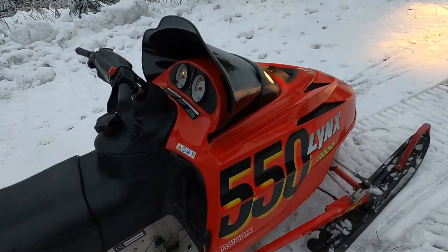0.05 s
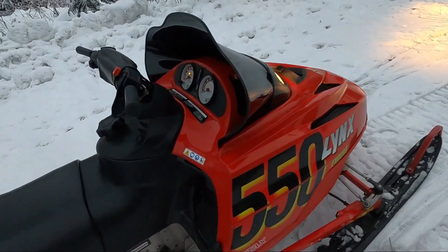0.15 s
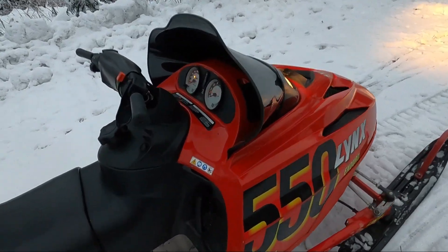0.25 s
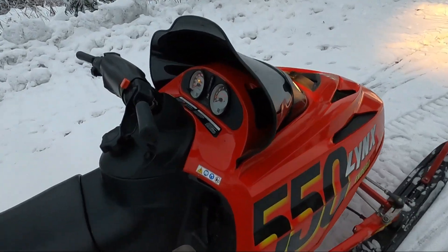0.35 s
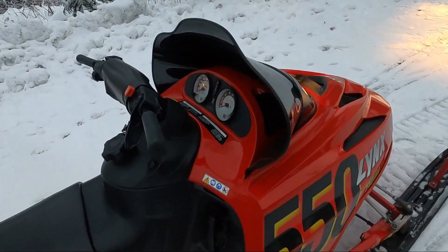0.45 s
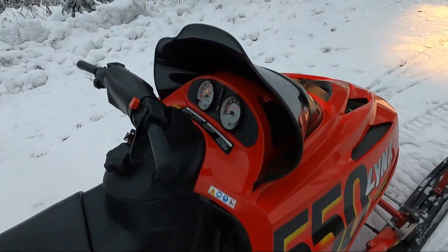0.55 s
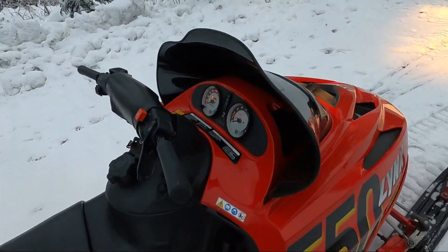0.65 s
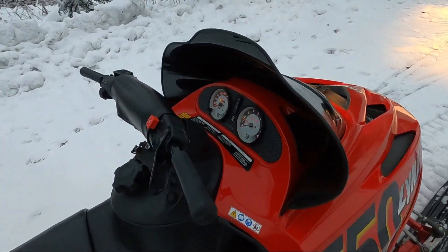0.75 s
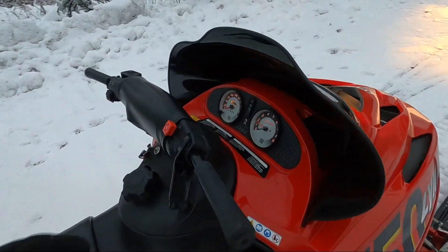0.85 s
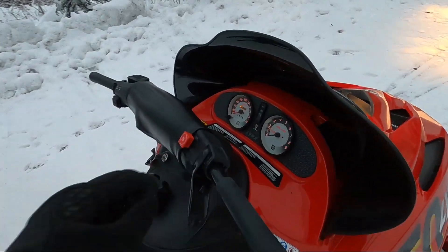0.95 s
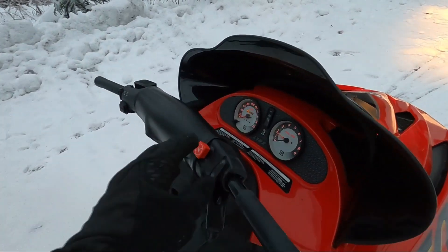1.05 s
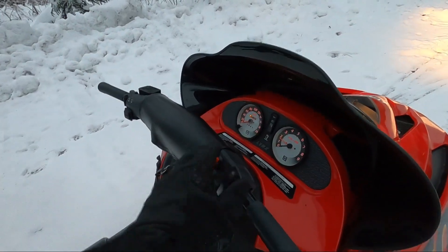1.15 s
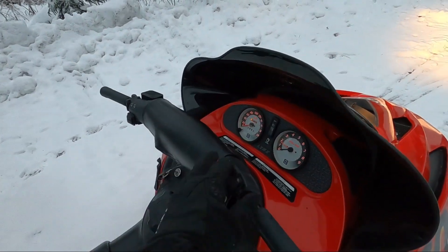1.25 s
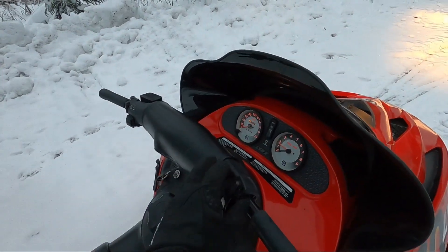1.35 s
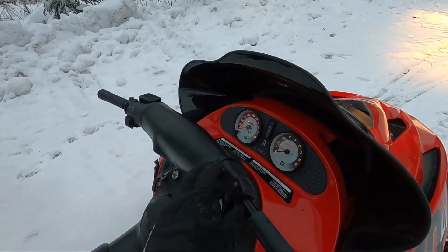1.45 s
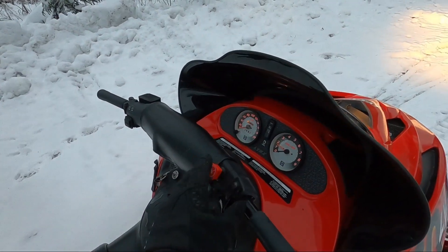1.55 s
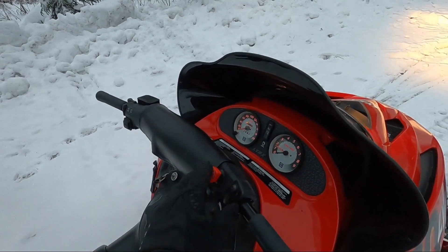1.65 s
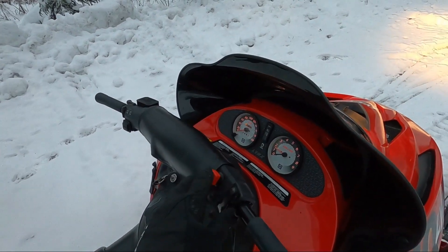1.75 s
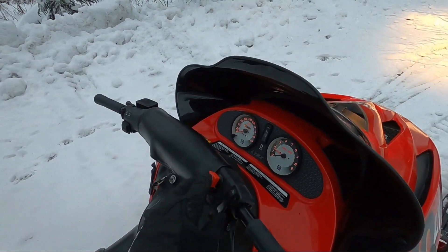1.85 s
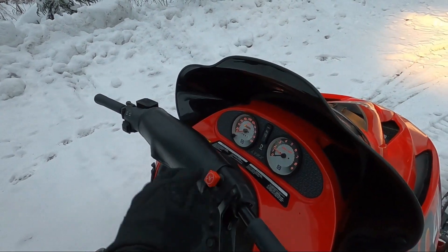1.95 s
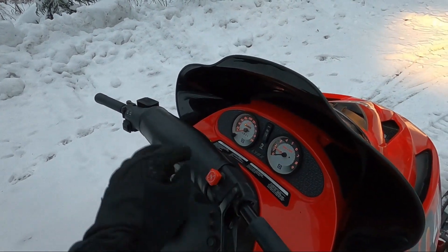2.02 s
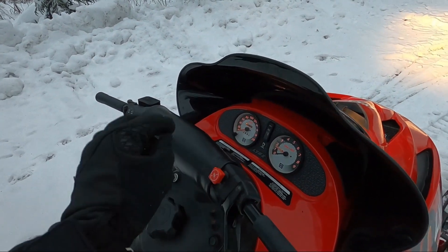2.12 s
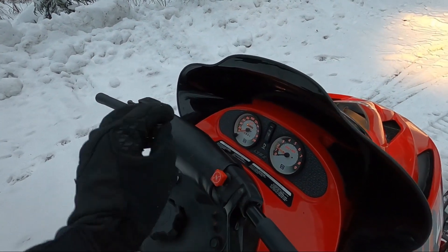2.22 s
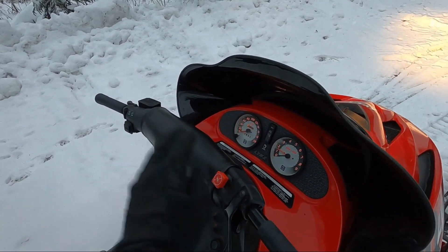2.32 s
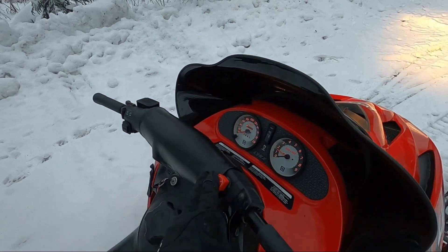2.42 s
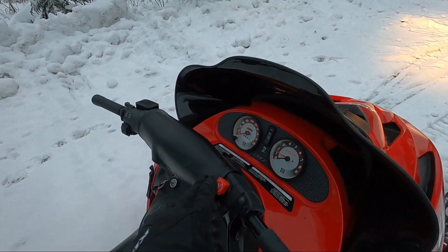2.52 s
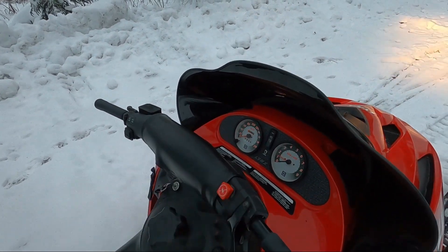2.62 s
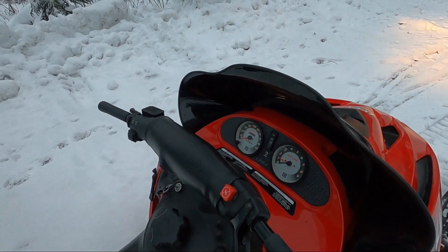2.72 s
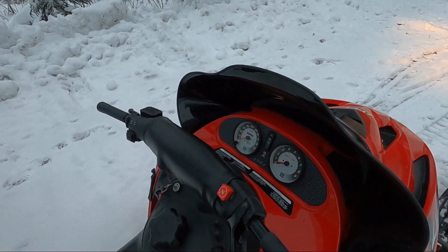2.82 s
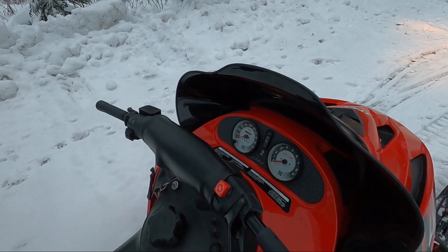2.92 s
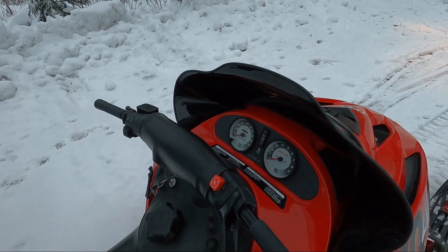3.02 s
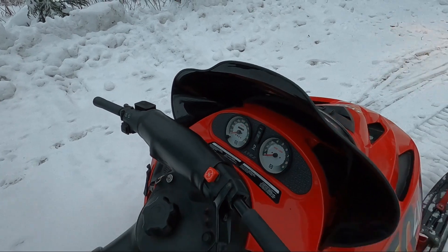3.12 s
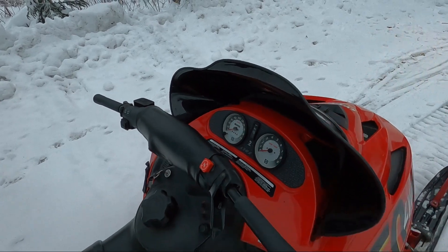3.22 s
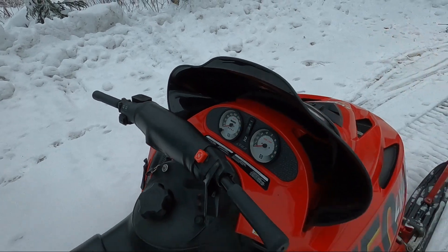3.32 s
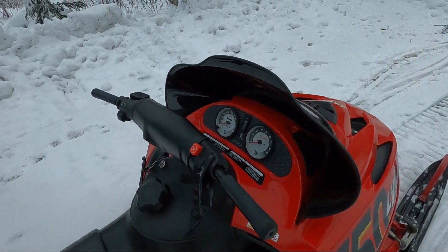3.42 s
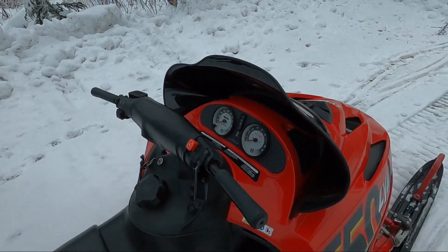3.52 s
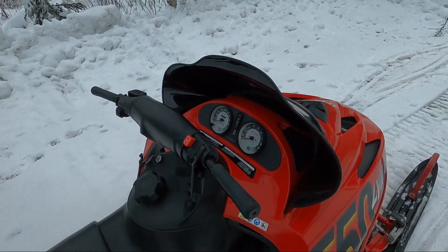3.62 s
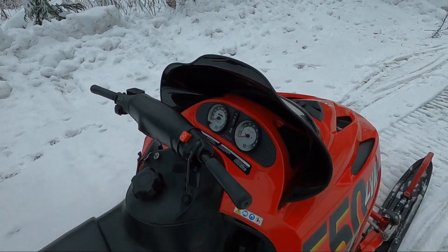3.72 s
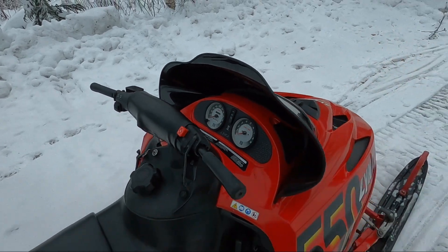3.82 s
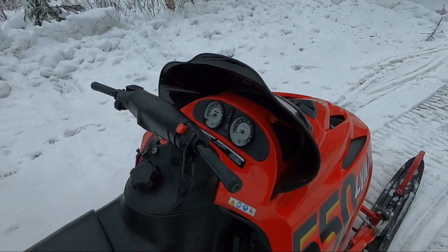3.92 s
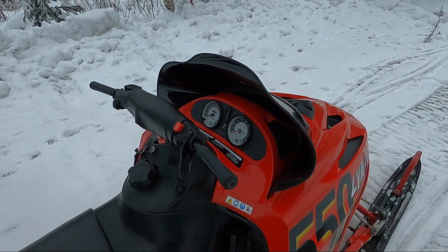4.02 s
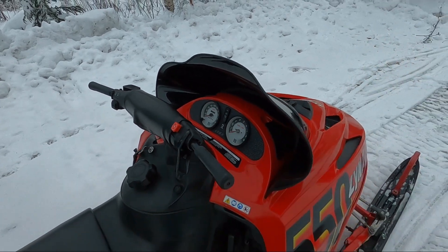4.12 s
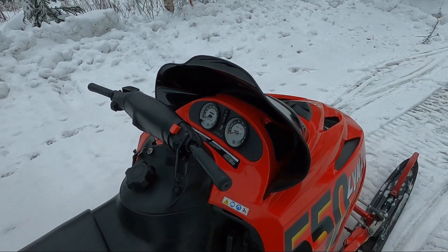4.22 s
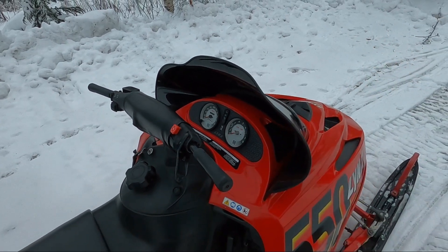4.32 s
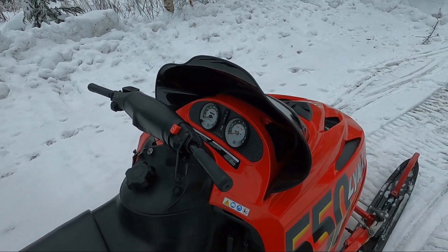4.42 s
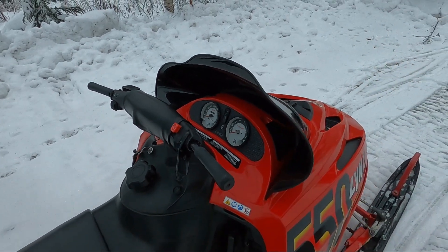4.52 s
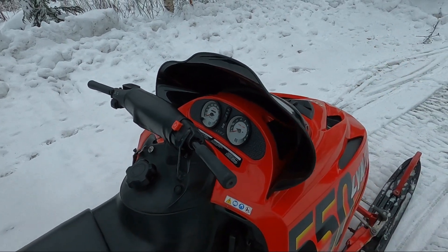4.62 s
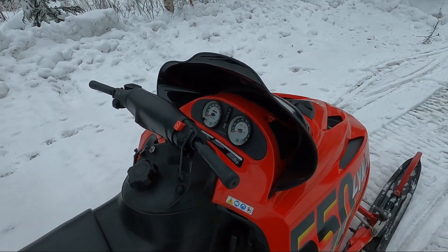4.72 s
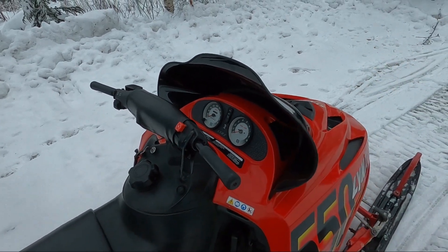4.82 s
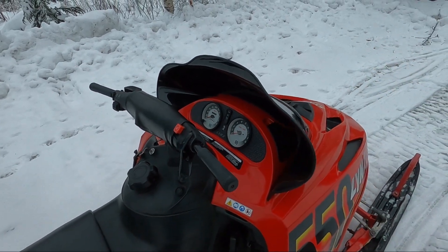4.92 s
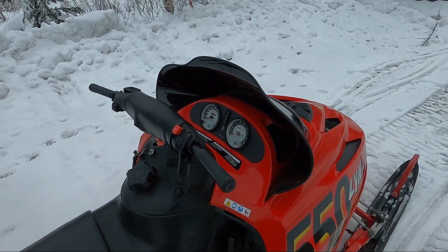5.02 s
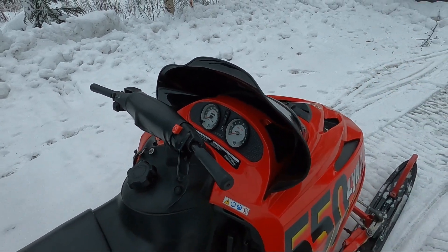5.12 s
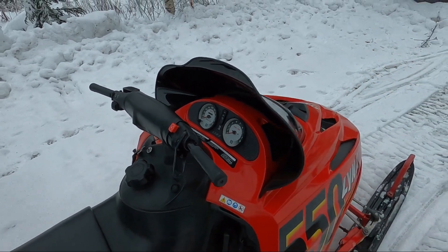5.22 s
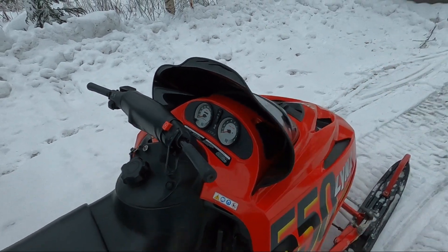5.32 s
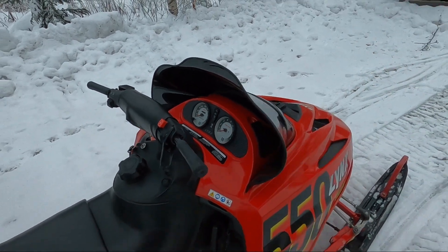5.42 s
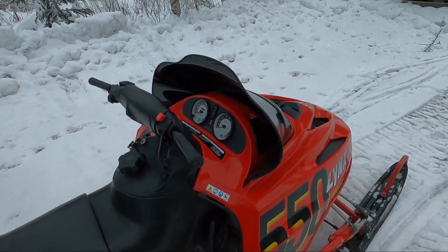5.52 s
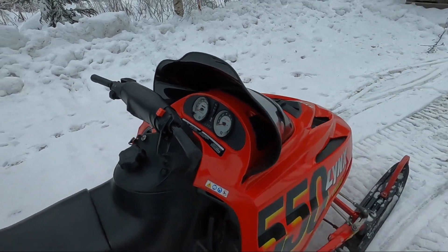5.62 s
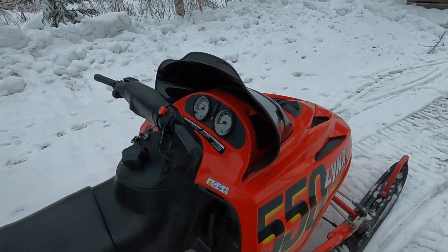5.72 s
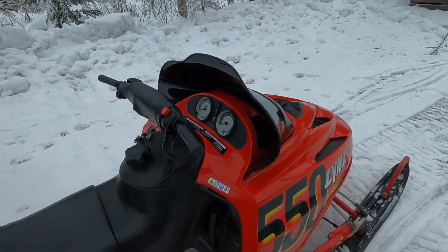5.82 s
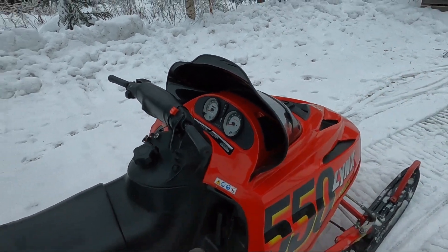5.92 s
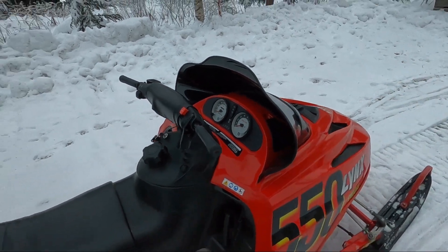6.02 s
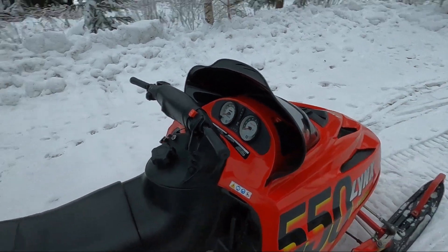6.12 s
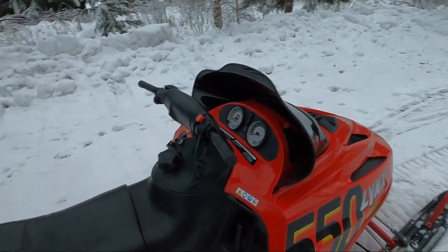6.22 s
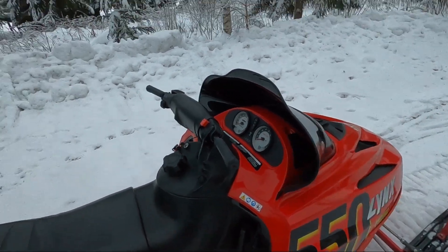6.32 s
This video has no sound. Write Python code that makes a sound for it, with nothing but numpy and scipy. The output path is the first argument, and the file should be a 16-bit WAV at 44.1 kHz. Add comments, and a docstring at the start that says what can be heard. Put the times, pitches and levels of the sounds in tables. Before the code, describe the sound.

Close to a parked snowmobile on open snow, its twin two-stroke engine idles loudly: fast low pulses, irregular popping barks, piston clack and shaken-panel rattle. A plastic switch snaps; the strokes slow over about a second amid dull knocks and clanks. Quiet air remains, with small clicks, bumps and cloth rubbing the handheld camera.

```python
"""Two-stroke snowmobile switched off

A twin-cylinder engine idles in still air: each piston stroke pulses pipe and crankcase resonances;
ignitions add barks and shaken-panel rattle. A switch snaps and the stroke rate falls evenly to rest
amid noisy knocks. Then gloves and sleeves rub on the camera: coloured noise swells, taps and body hum."""
import sys
import numpy as np
from scipy import signal
from scipy.fft import rfft, irfft
from scipy.io import wavfile
from scipy.ndimage import uniform_filter1d, minimum_filter1d

SR = 44100
rng = np.random.default_rng(int(sys.argv[2]) if len(sys.argv) > 2 else 0)


def wav_out(sig):
    """Save sig, one row per channel (or a flat mono array), as 16-bit PCM at SR to the path in sys.argv[1]."""
    wavfile.write(sys.argv[1], SR, np.round(np.clip(np.atleast_2d(sig).T, -1, 1) * 32767).astype(np.int16))


N = 280464
T = np.arange(N) / SR

# All table levels are relative unless said otherwise; "pan" is left minus right.
# Air hush colour. Each row: frequency in Hz, density in dB per Hz.
AIR_COLOUR = [(15, -53), (25, -24), (202, -21.5), (244, -9), (309, -17), (916, -29), (6000, -29),
              (14000, -55)]
# Far drone. Each row: frequency in Hz, width in Hz, level in dB.
DRONE_MODES = [(235, 51, 0)]

# Cloth strokes over the camera. Each row: middle in seconds, length in seconds, swish in dB,
# body hum in dB, pressure from 0 to 1, swish pan in dB.
RUBS = [(3.899, 0.22, -56.5, -54, 0.45, 2.5), (4.413, 0.11, -64, -77, 0, 4),
        (4.683, 0.44, -56.5, -65, 0.47, 12), (5.005, 0.055, -50, -69, 0.1, 13.5),
        (5.122, 0.12, -51.5, -64, 0.06, 4.5), (5.411, 0.12, -54, -44, 0.86, -1),
        (5.514, 0.09, -43, -40.5, 1, -3.5), (5.6, 0.044, -48, -60, 0.9, -3),
        (5.687, 0.11, -45, -37.5, 0.74, 0.5), (5.78, 0.093, -43.5, -71, 0.69, -0.5),
        (5.983, 0.11, -42.5, -38, 0.85, -1.5), (6.335, 0.33, -61, -58, 0.96, 8)]
# Cloth colours: pressed, light, dragged, sleeve rush, low flutter.
# Each row: frequency in Hz, density in dB per Hz.
PRESSED_COLOUR = [(210, -10), (350, -5.5), (480, -7), (630, 3.5), (800, -11.5), (1000, -6), (1260, 1.5),
                  (1550, -6.5), (3300, -8.5), (8030, -21.5), (14000, -42.5)]
LIGHT_COLOUR = [(400, -23), (1400, 3), (3000, 3), (5500, -3), (8200, -5), (10000, -16.5), (14000, -24)]
SCRAPE_COLOUR = [(88, -18), (180, 2), (240, -16), (370, -2), (520, -11.5), (760, -19.5), (1200, -12),
                 (1600, -28)]
RUSH_COLOUR = [(1600, -10), (2600, -2), (3600, -4.5), (4650, 1), (5500, -8), (6400, -11), (7400, -6.5),
               (8900, -10.5), (10400, -24), (12100, -18), (15000, -38)]
FLUTTER_COLOUR = [(25, 5), (50, 2), (120, -29), (300, -17)]
# Camera body under a rub, then under the drag. Each row: frequency in Hz, width in Hz, level in dB.
BODY_MODES = [(158, 17.3, 0)]
DRAG_MODES = [(60.4, 42, -5), (162, 38, 1)]
# Grip tightening rings the camera body. Each row: start in seconds, level in dB.
GRIPS = [(5.254, -45.5), (5.369, -31)]
# Camera shell clicks, then soft hand bumps.
# Each row: start in seconds, peak before panning in dB, pitch in Hz, pan in dB.
CLICKS = [(4.575, -45, 1120, 17), (4.641, -42, 855, 14), (4.655, -37, 1080, 10), (4.6955, -32, 1480, 11),
          (4.744, -37.5, 1200, 13), (4.760, -38.5, 744, 13), (4.791, -43, 1970, 23)]
BUMPS = [(3.722, -42.5, 200, -1), (3.871, -36, 190, 0), (3.937, -44, 200, 2), (3.99, -39, 204, 1),
         (5.615, -36.5, 50, -18)]

# Stop switch colour. Each row: frequency in Hz, density in dB per Hz.
SWITCH_COLOUR = [(1500, 2.5), (3000, 2.5), (6000, -7.5), (10000, -7.5), (15000, -34)]

# Knocks of loose crank and drive parts.
# Each row: start in seconds, jolt in dB, thud in dB, ring in dB, crack in dB.
KNOCKS = [(2.867, -20, -29, -34.5, -55), (2.904, -24, -36.5, -42, -63), (2.947, -22, -28, -34.5, -49.5),
          (2.993, -21, -33.5, -30.5, -51), (3.041, -25, -31.5, -44, -52), (3.066, -27, -36.5, -47, -63),
          (3.102, -28, -33.5, -32.5, -52), (3.132, -22, -37, -40, -56), (3.186, -44, -41, -40.5, -53),
          (3.228, -26, -35, -36.5, -53), (3.286, -22, -55, -44, -50.5), (3.342, -27.5, -37.5, -35, -61),
          (3.416, -36, -44.5, -45, -65), (3.47, -31, -34.5, -35, -43.5), (3.569, -35.5, -46, -47.5, -72),
          (3.609, -46, -53.5, -52, -55.5), (3.662, -48, -60, -51.5, -80), (3.714, -49, -66, -60, -80)]
# Thud, ring and chassis modes of a knock. Each row: frequency in Hz, width in Hz, level in dB.
THUD_MODES = [(494, 320, -6), (752, 180, -0.5), (1136, 130, -9.5)]
RING_MODES = [(1350, 220, -3), (1770, 200, 4.5), (2560, 760, -10.5)]
CHASSIS_MODES = [(74.7, 6, 4), (29.7, 9.2, -3.5)]
# Crack and tail colours of a knock. Each row: frequency in Hz, density in dB per Hz.
CRACK_COLOUR = [(2000, -4), (3900, -0.5), (5000, -5), (6200, -5), (8000, -11.5), (10000, -31)]
TAIL_COLOUR = [(700, -7), (1100, 1), (1400, -1), (1850, -3.5), (2300, -8), (4000, -20)]

# Engine on its mounts. Each row: frequency in Hz, width in Hz, level in dB.
MOUNT_MODES = [(30, 6.3, -2), (53.7, 4.8, -0.5)]
# Crankcase. Each row: frequency in Hz, width in Hz, first piston in dB, second piston in dB.
CRANKCASE_MODES = [(810, 135, 0, 0), (1130, 110, -11, -11), (1850, 220, -10, -11), (2400, 150, -7, -15),
                   (2980, 120, -16, -10), (3350, 220, -14, -17)]
# Cooling fan, then panel rattle. Each row: frequency in Hz, density in dB per Hz.
FAN_COLOUR = [(100, -25), (170, -7.5), (369, -8), (626, -13.5), (830, -17), (1000, -17), (1100, -12),
              (1410, -17.5), (2390, -18), (8000, -42.5), (15500, -69)]
RATTLE_COLOUR = [(150, -23.5), (230, -10), (272, 5), (308, -19.5), (525, -7.5), (603, -32), (882, -6),
                 (995, -12.5), (1080, -14.5), (2090, -12), (2850, -20), (3500, -19), (7900, -32.5),
                 (15500, -60)]
# Ringing panels and clutch. Each row: frequency in Hz, width in Hz, level in dB.
PANEL_MODES = [(695.6, 26, -5.5), (885, 27, -2.5), (1113, 28, -8.5), (1342, 20, -7.5), (1615, 26, -4.5),
               (1824, 61, -11.5), (1902, 54, -6.5), (2030, 22, -1.5), (2155, 33, -5.5), (2257, 25, -9),
               (2500, 30, -12.5), (2650, 20, -11.5)]
# Ignitions, mostly three or six strokes apart. Each row: time in seconds, rattle in dB, bark in dB.
FIRINGS = [(0.073, -14.5, -25.5), (0.129, -36, -34), (0.210, -23.5, -28), (0.331, -22, -28),
           (0.408, -17, -24), (0.448, -24, -25), (0.604, -14.5, -26.5), (0.66, -17, -24), (0.712, -16, -26),
           (0.825, -18.5, -23), (0.940, -14.5, -22.5), (0.997, -14.5, -24), (1.051, -16.5, -24),
           (1.158, -15, -24), (1.214, -27, -20.5), (1.271, -15, -24.5), (1.365, -14.5, -24.5),
           (1.419, -20.5, -27), (1.535, -15.5, -24), (1.592, -17, -26), (1.648, -20.5, -22.5),
           (1.768, -16.5, -25), (1.867, -13.5, -22), (1.921, -22, -27), (2.034, -17, -22.5),
           (2.131, -12.5, -24), (2.264, -16, -23.5), (2.380, -23, -24), (2.460, -21, -28)]
# Air moved per stroke, held before the first row. Each row: time in seconds, level in dB.
PUFF_LEVEL = [(2.55, -1.5), (2.95, 1.5), (3.12, -4.5), (3.28, -3.5), (3.4, -16.5)]
# Exhaust and intake of a stroke, hot. Each row: frequency in Hz, level in dB.
PIPE_COLOUR = [(22, -21), (36, -20.5), (52, -3.5), (68, -3.5), (86, 15), (106, 6), (130, 1.5), (158, -17),
               (210, -16.5), (300, -23.5), (500, -44)]
# Pipe struck by an ignition, gas noise, lingering hum. Each row: frequency in Hz, width in Hz, level in dB.
BARK_MODES = [(82.7, 11, -2), (143, 25, -14), (186, 18, -13.5), (268.2, 12.2, -13), (455, 110, -36.5)]
GAS_MODES = [(270, 24, 9), (490, 140, -4), (704, 29, -6.5), (860, 27, -3.5), (1125, 280, -8)]
PIPE_HUM_MODES = [(76.36, 2.1, 0)]

# Rub: bell exponent; the hum comes later and lasts longer.
RUB_SHAPE, HUM_LAG_S, HUM_STRETCH = 1.52, 0.016, 1.16
GRIP_HZ, GRIP_RISE_S, GRIP_FALL_S, GRIP_PAN_DB = 150.8, 0.014, 0.061, -24.5
# A sleeve drags over the microphone; its bright rush starts earlier. Times are middles.
DRAG_S, DRAG_LENGTH_S, DRAG_DB = 6.2, 0.14, -37.5
RUSH_S, RUSH_LENGTH_S, RUSH_DB = 6.182, 0.16, -42.5
SWITCH_S, SWITCH_DB, SWITCH_FALL_S = 2.4635, -20, 0.0025
# Piston strokes per second at idle, and at the start of the coast.
IDLE_HZ, COAST_HZ, FRICTION_HZ_PER_S = 52, 47.4, 50
LAST_SPARK_S = FIRINGS[-1][0]
REST_S = LAST_SPARK_S + COAST_HZ / FRICTION_HZ_PER_S
# An ignition throws the crank ahead by a share of a stroke, then it sags back.
KICK_STROKES, KICK_RISE_S, KICK_SAG_S = 0.25, 0.023, 0.066
# Stroke rates: rocking sets in below, slaps sound above, drive train is slack below.
ROCK_BELOW_HZ, SLAP_ABOVE_HZ, STALL_HZ = 38, 28, 14
ROCK_DB = 2.5
LOADED_SLAP_DB, UNLOAD_S, SLAP_FADE_DB_PER_S = -5, 0.067, 0.5
# Random spread between ignitions: pitch as a share, level in dB.
PANEL_DETUNE, PANEL_SCATTER_DB = .006, 1.8
# Pipe cooling: frequency ratio, time constant, cold level.
COLD_RATIO, COOLING_S, COLD_DB = 0.871, 0.17, 18.5
LIMIT_DB, LIMIT_S, TOP_HZ = -4.5, .006, 15600


def undb(db):
    """Amplitude ratio of a level in dB."""
    return 10 ** (np.asarray(db) / 20)


def curve(rows, axis=1):
    """One table column joined by straight lines in time."""
    rows = np.array(rows)
    return np.interp(T, rows[:, 0], rows[:, axis])


def unit(x):
    """Scale to unit RMS."""
    return x / np.sqrt(np.mean(x ** 2))


def noise():
    """White Gaussian noise."""
    return rng.standard_normal(N)


def walk(rate_hz):
    """Random wander: straight lines between new values at the given rate."""
    return 0.85 * np.interp(T * rate_hz, np.arange(N), noise())


def ring(x, response):
    """Pass x through a response of unit energy."""
    return signal.fftconvolve(x, response / np.linalg.norm(response))[:len(x)]


def colour(x, points, size=8192):
    """Minimum-phase filter through (Hz, dB) points, falling away beyond both ends."""
    hz, db = np.transpose(points)
    f = np.arange(size // 2 + 1) * SR / size + 1
    above = np.maximum(f / hz[-1], 1) ** 4
    below = np.maximum(hz[0] / f, 1)
    db = np.interp(np.log(f), np.log(hz), db) - 20 * np.log10(above * below)
    cepstrum = irfft(np.log(undb(db)))[:size // 2]
    cepstrum[1:] *= 2  # folded: causal
    return ring(x, irfft(np.exp(rfft(cepstrum, size))))


def resonate(x, modes, order=0):
    """Damped resonances (Hz, width Hz, dB); order 1 gives a soft onset and steep flanks."""
    t = T[:min(len(x), SR)]
    response = 0
    for hz, width, db in modes:
        decay = (width * t) ** order * np.exp(-np.pi * width * t)
        response = response + undb(db) * width * decay * np.sin(2 * np.pi * hz * t)
    return ring(x, response)


def swell(start, rise, fall):
    """Envelope: linear rise to 1, exponential decay."""
    age = T - start
    return np.clip(age / rise, 0, 1) * np.exp(-np.clip((age - rise) / fall, 0, 50))


def bell(middle, length):
    """Envelope of one sliding movement."""
    return np.exp(-np.minimum(np.abs(2 * (T - middle) / length) ** RUB_SHAPE, 50))


def smear(pulses, rise, fall):
    """Give every pulse an envelope."""
    return signal.fftconvolve(pulses, swell(0, rise, fall)[:SR])[:N]


def cushion(x, hz):
    """Rubber mounts pass only the lows."""
    return signal.sosfilt(signal.butter(2, hz, fs=SR, output="sos"), x)


def pan(db):
    """Left and right gains differing by db."""
    return undb(np.array([[.5], [-.5]]) * db)


def spread(make, side_db, corner_hz):
    """Two draws of a sound as mid and side; the side is high-passed, so ports differ most in the treble."""
    highpass = signal.butter(1, min(corner_hz, SR / 3), "high", fs=SR, output="sos")
    side = signal.sosfilt(highpass, make())
    return make() + undb(side_db) * side * np.array([[1], [-1]])


def still_air():
    """Open-air hush of coloured noise with a far low drone of resonant noise."""
    def air():
        hush = undb(-64) * colour(noise(), AIR_COLOUR)
        return hush + undb(-69.5) * resonate(noise(), DRONE_MODES)
    return spread(air, -2.5, 300)


def slips():
    """Cloth friction as tiny slips: noise with fast and slow level wander."""
    return unit(noise() * undb(0.68 * walk(700) + 3.4 * walk(50)))


def light_cloth():
    """Slips of lightly touching cloth."""
    return colour(slips(), LIGHT_COLOUR)


def rubs():
    """Cloth swishes, duller when pressed; the body hums with it, mostly at the right port."""
    bright = spread(light_cloth, -7, 820)
    dull = spread(lambda: colour(slips(), PRESSED_COLOUR), -4.1, 670)
    hum = resonate(slips(), BODY_MODES)
    flutter = undb(-10.5) * colour(slips(), FLUTTER_COLOUR)
    out = np.zeros((2, N))
    for s, length, swish_db, hum_db, pressure, pan_db in RUBS:
        pressed = np.clip(pressure, 0, 1)
        lean_db = -2 - 16 * pressed
        swish = (pressed * dull + (1 - pressed) * bright) * undb(swish_db) * pan(pan_db)
        body = hum * undb(0.13 * lean_db) * pan(lean_db) + flutter * pan(0.36 * lean_db)
        out += swish * bell(s, length)
        out += body * undb(hum_db) * bell(s + HUM_LAG_S, length * HUM_STRETCH)
    return out


def grips():
    """A tightening grip rings the camera body: a sine with a short swell."""
    out = 0
    for s, db in GRIPS:
        out = out + undb(db) * swell(s, GRIP_RISE_S, GRIP_FALL_S) * np.sin(2 * np.pi * GRIP_HZ * (T - s))
    return undb(-7.5) * out * pan(GRIP_PAN_DB)


def sleeve_drag():
    """A sleeve on the microphone: low scrape and body resonance under a bright rush."""
    scrape = spread(lambda: colour(slips(), SCRAPE_COLOUR), -3.1, 150) * pan(5.1)
    body = undb(-1) * resonate(slips(), DRAG_MODES) * pan(-10)
    rush = spread(lambda: colour(noise(), RUSH_COLOUR), -0.55, 150) * pan(6.7)
    low = (scrape + body) * undb(DRAG_DB) * bell(DRAG_S, DRAG_LENGTH_S)
    return low + rush * undb(RUSH_DB) * bell(RUSH_S, RUSH_LENGTH_S)


def glove_brush():
    """The glove brushes the handlebar as it leaves the switch: a swell of light slips."""
    return spread(light_cloth, -2, 600) * swell(2.97, .03, 0.035) * undb(-42)


def handling():
    """All cloth and grip sounds."""
    return glove_brush() + sleeve_drag() + rubs() + grips()


def taps(rows, cycles, grit):
    """Each tap is a heavily damped swing with a short gritty tail."""
    out = np.zeros((2, N))
    for s, db, hz, pan_db in rows:
        swing = np.sin(2 * np.pi * (T - s) * hz) * swell(s, cycles / hz / 2, cycles / hz)
        tail = colour(noise() * swell(s, 0.000094, 0.012), [(hz / 2, 0), (2 * hz, 0), (4 * hz, -9)])
        tap = swing + grit * tail
        out += undb(db) * pan(pan_db) * tap / np.abs(tap).max()
    return out


def switch():
    """Bright plastic snap of the stop switch: a short burst of coloured noise."""
    def snap():
        return colour(noise() * swell(SWITCH_S, 0.0012, SWITCH_FALL_S), SWITCH_COLOUR)
    return undb(SWITCH_DB) * spread(snap, -2, 2000)


def speed():
    """Strokes per second: steady at idle, then falling evenly to rest under friction."""
    return np.where(T < LAST_SPARK_S, IDLE_HZ, FRICTION_HZ_PER_S * np.maximum(REST_S - T, 0))


def crank():
    """One pulse per stroke: ignitions kick the crank ahead; it coasts, then rebounds once off compression."""
    sparks = np.array(FIRINGS)[:, 0]
    times = np.append(0, sparks)
    # whole strokes between ignitions
    counts = np.cumsum(np.round(np.diff(times, prepend=0) * IDLE_HZ))
    lead = KICK_STROKES * sum(swell(s + .006, KICK_RISE_S, KICK_SAG_S) for s in sparks[:-1])
    idling = np.interp(T, times, counts - np.interp(times, T, lead)) + lead
    coasting = counts[-1] + np.cumsum(speed() * (T >= LAST_SPARK_S)) / SR
    turns = np.where(T < LAST_SPARK_S, idling, coasting)
    strokes = np.diff(np.floor(np.maximum.accumulate(turns)), prepend=-1)
    return strokes + signal.unit_impulse(N, int(REST_S * SR))


def bounce(blows):
    """A blow followed by a short noisy bounce."""
    return blows + 0.09 * noise() * smear(blows, .004, .005)


def knocks():
    """Blows ring the crankcase while it turns, then slack drive parts, which rattle and rock the chassis."""
    jolt, thud, clank, crack = np.zeros((4, N))
    for s, *db in KNOCKS:
        i = int(s * SR)
        jolt[i], thud[i], clank[i], crack[i] = undb(db)
    slack = speed() < STALL_HZ
    case_modes = [(hz, width, max(db)) for hz, width, *db in CRANKCASE_MODES[2:]]
    low = undb(22.5) * resonate(bounce(thud), THUD_MODES, order=1)
    slap = undb(19) * resonate(bounce(clank * ~slack), case_modes, order=1)
    middle = undb(20) * resonate(bounce(clank * slack), RING_MODES, order=1)
    snap = undb(1) * spread(lambda: colour(noise() * smear(crack, 0.0034, 0.015), CRACK_COLOUR), -8, 3000)
    tail = undb(-12.5) * colour(noise() * smear(clank * slack, 0.0047, 0.06), TAIL_COLOUR)
    rock = undb(30.5) * resonate(jolt * slack, CHASSIS_MODES)
    return low + slap + middle + snap + tail + cushion(rock, 160)


def rocking(strokes):
    """The last slow strokes excite the engine's mount resonances."""
    slow = np.clip(2 * (1 - speed() / ROCK_BELOW_HZ), 0, 1)
    push = strokes * slow * undb(curve(PUFF_LEVEL))
    return undb(ROCK_DB) * cushion(resonate(push, MOUNT_MODES), 160)


def fan():
    """Cooling fan: coloured noise whose level follows the stroke rate and wanders."""
    pace = speed() / IDLE_HZ
    air = spread(lambda: colour(noise(), FAN_COLOUR), -0.54, 6500)
    return undb(-33.3) * air * pace ** 0.65 * undb(2 * walk(60))


def piston_slap(strokes):
    """Two pistons clack in turn, each with its own ring, harder once they coast."""
    coasted_s = np.maximum(T - LAST_SPARK_S, 0)
    slap_db = LOADED_SLAP_DB * np.exp(-coasted_s / UNLOAD_S) - SLAP_FADE_DB_PER_S * coasted_s
    # slower strokes are heard as single knocks
    slaps = strokes * undb(slap_db + 1.2 * noise()) * (speed() > SLAP_ABOVE_HZ)
    second = np.cumsum(strokes) % 2
    clack = 0
    for piston, turn in enumerate((1 - second, second)):
        blow = np.roll(slaps * turn, int(.006 * SR))  # just after the puff
        bounces = 0.07 * noise() * smear(blow, 0.002, 0.004)
        modes = [(hz, width, db[piston]) for hz, width, *db in CRANKCASE_MODES]
        clack = clack + resonate(blow + bounces, modes, order=1)
    return undb(-7) * clack


def bodywork(strokes):
    """Ignitions shake panels into a rattle that pulses with the strokes and rings differently each time."""
    jolts = 1 + 0.7 * smear(np.roll(strokes, int(0.0053 * SR)), 0.003, 0.0037)

    def hits():
        return unit(noise() * undb(1.6 * walk(1500))) * jolts

    drive = hits()
    shake = swell(0.0032, 0.012, 0.045)[:SR // 2]
    panels = np.zeros(N)
    for s, db, _ in FIRINGS:
        span = slice(int(s * SR), int(s * SR) + len(shake))
        modes = []
        for hz, width, level in PANEL_MODES:
            a, b = rng.standard_normal(2)
            modes.append((hz * (1 + PANEL_DETUNE * a), width, level + PANEL_SCATTER_DB * b))
        panels[span] += undb(db) * resonate(drive[span] * shake, modes)
    # constant faint ringing while the engine runs
    panels += undb(-35) * resonate(hits() * (T < LAST_SPARK_S + .06), PANEL_MODES)
    bursts = np.sqrt(sum((undb(db) * swell(s - .006, 0.0077, 0.044)) ** 2 for s, db, _ in FIRINGS))
    rattle = spread(lambda: colour(hits() * bursts, RATTLE_COLOUR), 0, 4600)
    return undb(-10.5) * panels + undb(-10.5) * rattle


def exhaust(strokes):
    """Strokes pump the pipe, burning ones harder with a bark; it deepens as it cools, its hum lingers."""
    burn = sum(undb(db) * swell(s - .014, 0.0057, 0.018) for s, _, db in FIRINGS)
    puffs = strokes * undb(curve(PUFF_LEVEL) + .5 * noise()) * (1 + 13 * burn)
    heat = np.exp(-np.maximum(T - LAST_SPARK_S, 0) / COOLING_S)
    cold_colour = [(hz * COLD_RATIO, db) for hz, db in PIPE_COLOUR]
    hot = undb(15.5) * colour(puffs * heat, PIPE_COLOUR)
    cold = undb(COLD_DB) * colour(puffs * (1 - heat), cold_colour)
    hum = undb(6.5) * resonate(cushion(puffs, 300), PIPE_HUM_MODES)
    bark = undb(36.5) * resonate(strokes * burn * undb(0.5 * noise()), BARK_MODES)
    gas = undb(2) * burn * resonate(noise(), GAS_MODES)
    return hot + cold - hum + bark + gas


def engine():
    """The machine stands a little to the right, so it reaches the left port later."""
    strokes = crank()
    panned = bodywork(strokes) + piston_slap(strokes) + fan() + knocks()
    left, right = panned * pan(-1.7) + exhaust(strokes) + rocking(strokes)
    return np.array([np.interp(T - 3.4e-5, T, left), right])


def scene():
    """Sum of all sources."""
    camera = taps(CLICKS, cycles=0.64, grit=0.1) + taps(BUMPS, cycles=0.87, grit=.01) + handling()
    return still_air() + camera + switch() + engine()


def record(dry):
    """The deepest rumble is removed; the camera ducks the highest peaks and cuts the top of the treble."""
    dry = signal.sosfilt(signal.butter(1, 12, "high", fs=SR, output="sos"), dry)
    room = 1 / np.maximum(np.abs(dry).max(axis=0) / undb(LIMIT_DB), 1)
    span = int(LIMIT_S * SR)
    gain = uniform_filter1d(minimum_filter1d(room, 2 * span), span)
    return signal.sosfilt(signal.ellip(10, .2, 80, TOP_HZ, fs=SR, output="sos"), dry * gain)


dry = scene()
out = record(dry)
wav_out(out)
```